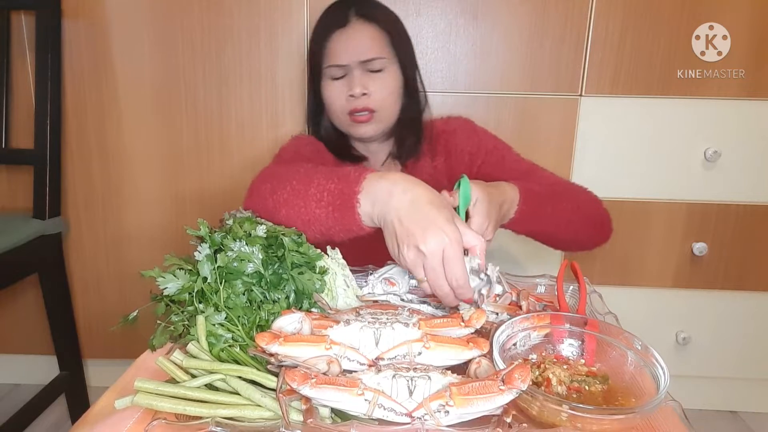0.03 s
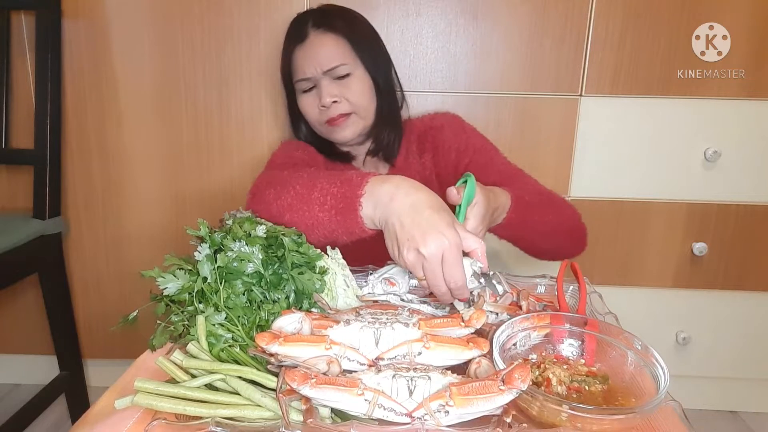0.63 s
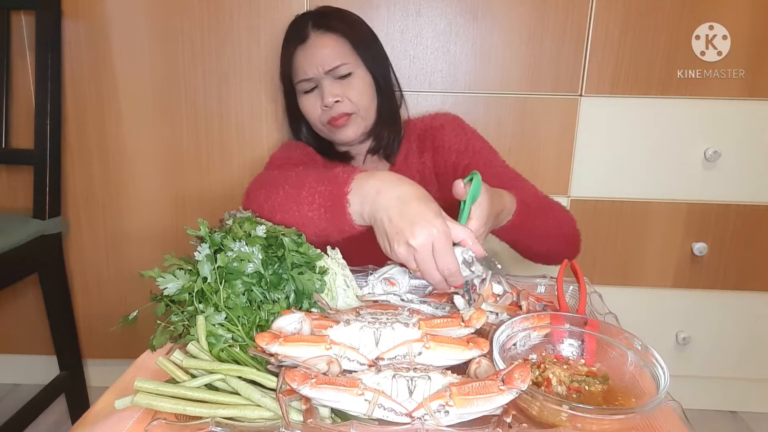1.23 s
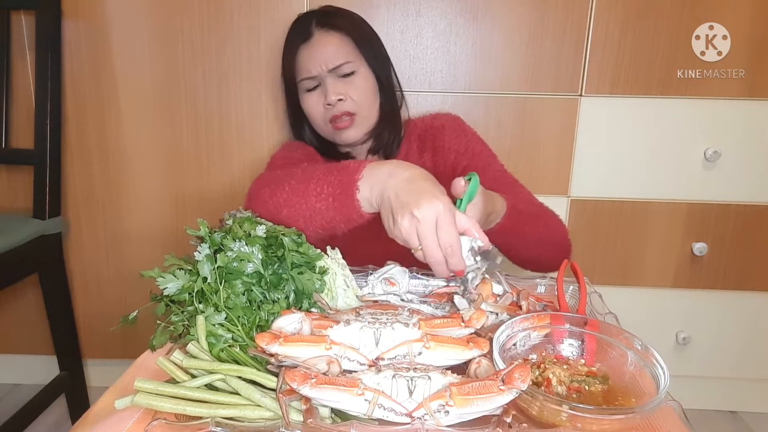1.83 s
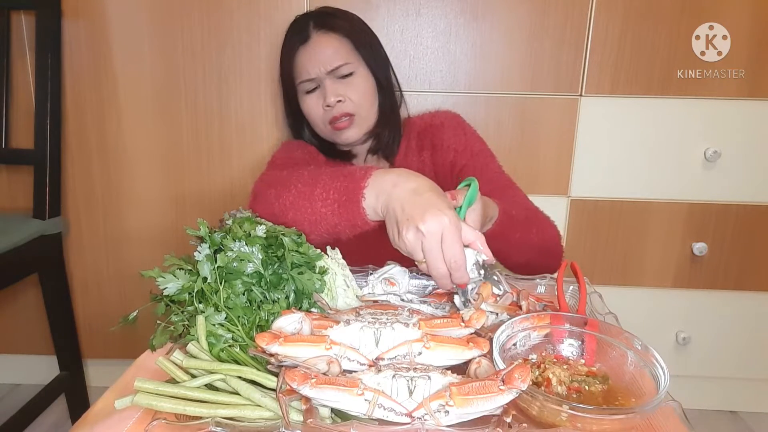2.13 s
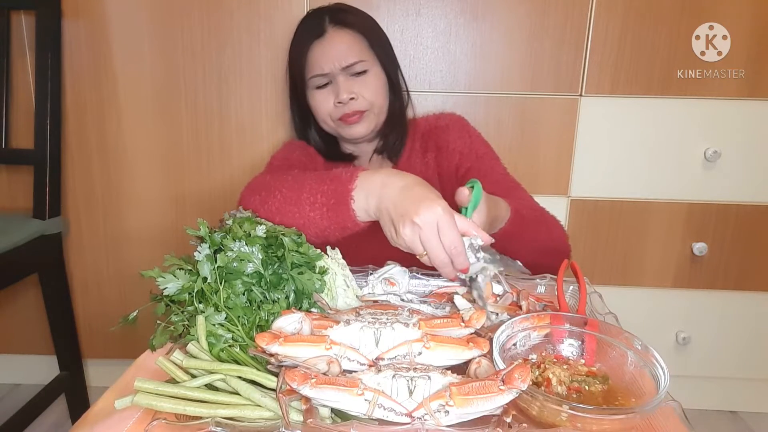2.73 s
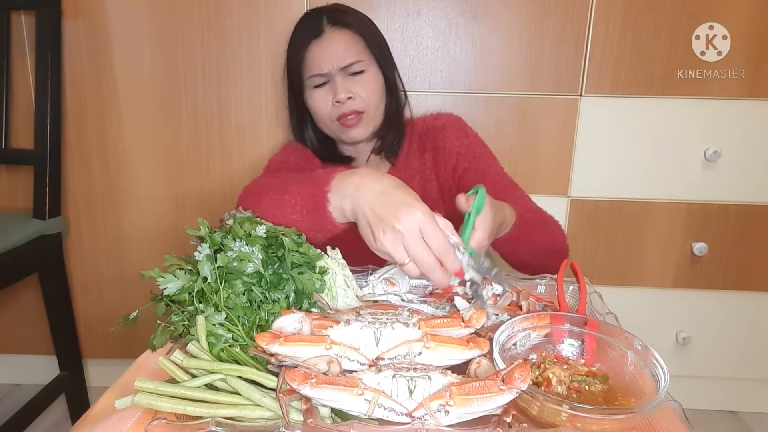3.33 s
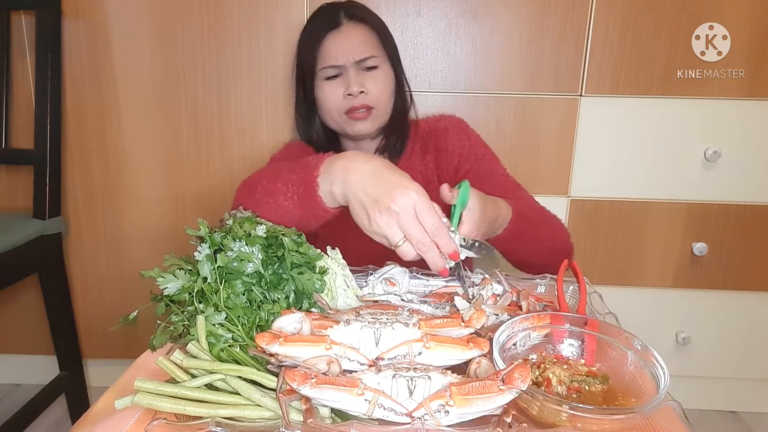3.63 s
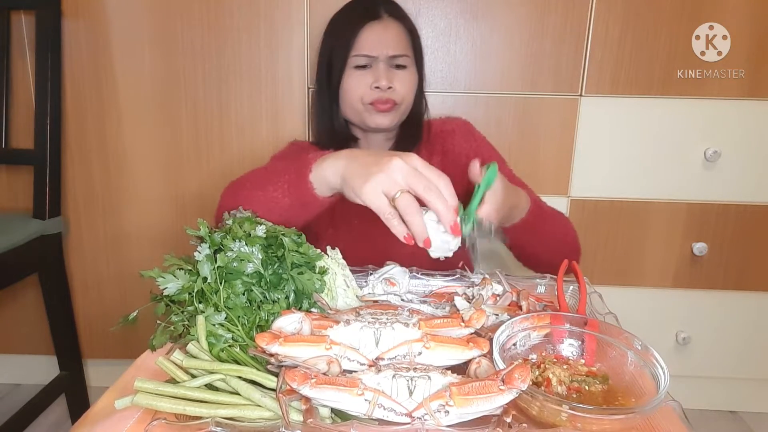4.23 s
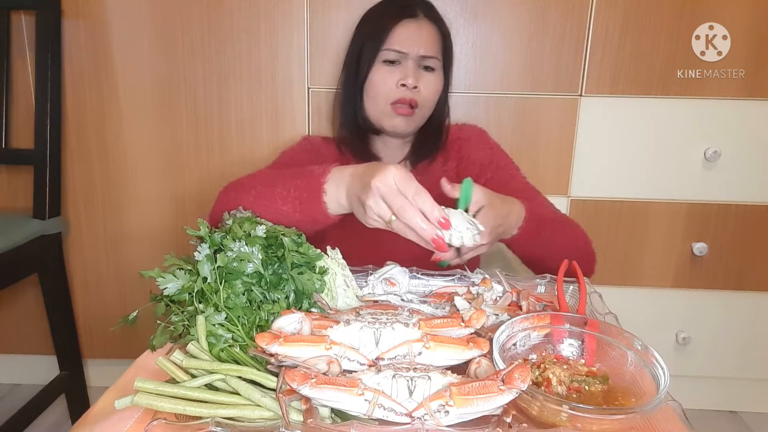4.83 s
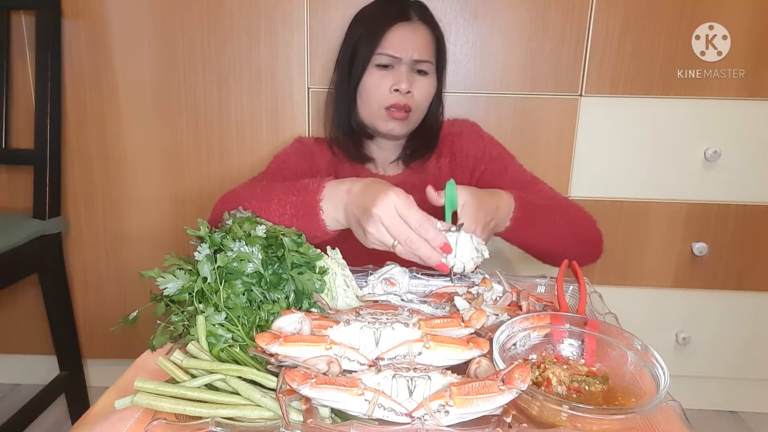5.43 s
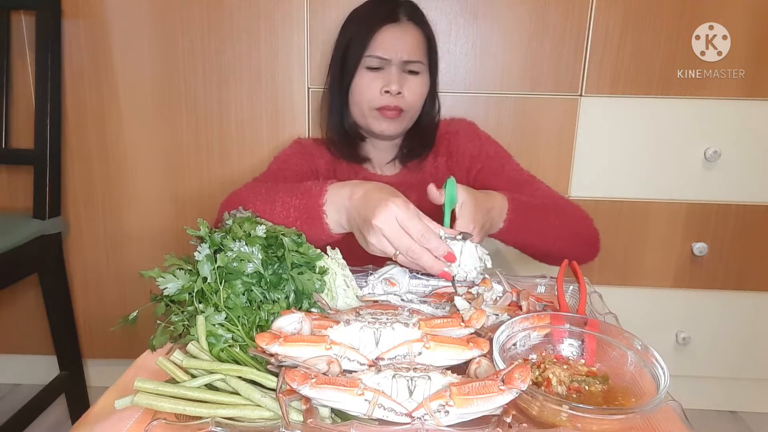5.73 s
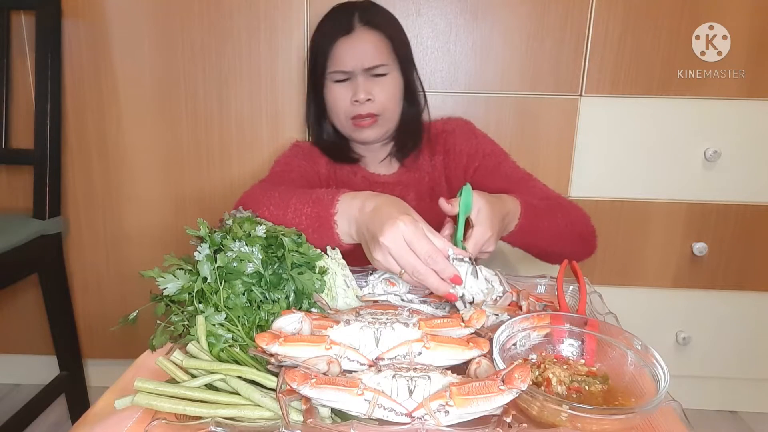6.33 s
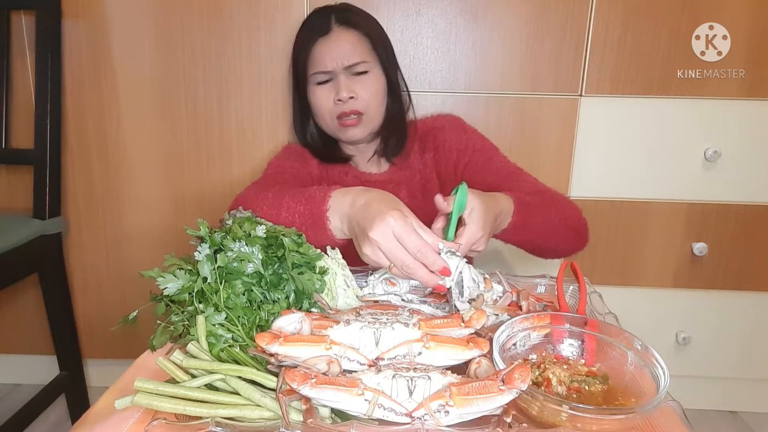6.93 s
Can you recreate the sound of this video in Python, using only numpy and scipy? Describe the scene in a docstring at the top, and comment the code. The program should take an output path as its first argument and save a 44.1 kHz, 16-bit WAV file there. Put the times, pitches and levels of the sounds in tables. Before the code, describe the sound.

In a small, hard-walled room, crab shell breaks close to the microphone as scissors work through it. Crisp snaps at the start give way to light ticks, soft scraping and faint finger rubbing. A strong double crunch comes with a knock on the tray, then things go nearly quiet before a dense series of sharp cracks and splintering. An appliance hums very faintly underneath.

```python
"""A small hard-walled dining room, where kitchen scissors cut through a cooked crab over a serving tray.
The shell fails by brittle fracture, in clusters of millisecond cracks that excite its cavities. Friction
sets the steel blades ringing; fingers crumble and rub the shell; the crab knocks and squeaks on the tray,
and the table thuds under the hands. The room reverberates after every crack, over a faint appliance hum."""
import sys
import numpy as np
from scipy import signal
from scipy.fft import rfft, irfft
from scipy.io import wavfile
from scipy.ndimage import uniform_filter1d

SR = 44100
rng = np.random.default_rng(int(sys.argv[2]) if len(sys.argv) > 2 else 0)


def inscribe(sig):
    """Save sig as 16-bit PCM at rate SR to the path in sys.argv[1].

    A 1-D sig is mono; a 2-D sig holds one channel per row.
    Samples are clipped to [-1, 1] before scaling.
    """
    pcm = np.round(np.clip(np.atleast_2d(sig).T, -1, 1) * 32767)
    wavfile.write(sys.argv[1], SR, pcm.astype(np.int16))


N = 317079
T = np.arange(N) / SR
LEAD = SR // 10  # samples before time zero


def undb(db):
    """Amplitude ratio of a level in decibels."""
    return 10 ** (np.asarray(db) / 20)


def unit(x):
    """Normalisation to rms 1."""
    return x / np.sqrt(np.mean(x ** 2))


def with_energy(x, seconds):
    """Normalisation to the energy of rms 1 held for the given time."""
    return x * np.sqrt(seconds * SR / np.mean(np.sum(x ** 2, axis=-1)))


def clock(seconds):
    """Time axis of a transient."""
    return np.arange(int(seconds * SR)) / SR


def add(bus, s, x):
    """Superposition of a sound on a bus at time s."""
    i = LEAD + int(s * SR)
    bus[:, i:i + x.shape[-1]] += x[..., :bus.shape[1] - i]


def on_log(hz, points):
    """Interpolation of (f/Hz, value) points in log frequency."""
    f, values = np.transpose(points)
    return np.interp(np.log(hz + 1), np.log(f), values)


def cut(x, order, hz, kind):
    """Maximally flat low-pass or high-pass filter."""
    return signal.sosfilt(signal.butter(order, hz, kind, fs=SR, output="sos"), x)


def colour(x, *spectra):
    """Minimum-phase filter of the summed (f/Hz, level/dB) spectra: attacks stay sharp."""
    hz = np.linspace(0, SR / 2, 1025)
    cepstrum = irfft(np.log(undb(sum(on_log(hz, s) for s in spectra))))
    causal_fold = np.r_[1, np.full(len(hz) - 2, 2), 1, np.zeros(len(hz) - 2)]
    response = irfft(np.exp(rfft(cepstrum * causal_fold)))
    return signal.fftconvolve(x, response[None], axes=-1)[:, :x.shape[-1]]


def stereo_noise(size, width=1., apart_hz=800):
    """Spatial coherence: noise at two nearby points is alike in the bass, less so in the treble."""
    mid, side = rng.standard_normal((2, size))
    side = width * cut(side, 1, apart_hz, "high")
    return np.array([mid + side, mid - side])


def wander(rate_hz):
    """Slow random modulation of rms 1."""
    hold = int(SR / rate_hz)
    steps = np.repeat(rng.standard_normal(N // hold + 1), hold)
    return unit(uniform_filter1d(uniform_filter1d(steps, hold), hold)[:N])


def ring(modes, t):
    """Modal superposition: damped sines, weighted at random for the point of contact."""
    hz, db, t60 = np.transpose(modes)[:, :, None]
    weight = undb(db + 2 * rng.standard_normal(hz.shape)) * rng.choice([-1, 1], hz.shape)
    return np.sum(weight * np.sin(2 * np.pi * hz * t) * np.exp(-np.log(1000) * t / t60), axis=0)


def grit(size, rate_hz, spread_db, slip_s=0.00022):
    """Friction as shot noise: brief random slips of unequal size."""
    onsets = rng.random(size) < rate_hz / SR
    slips = onsets * undb(spread_db * np.minimum(rng.exponential(size=size), 5))
    return signal.lfilter([1], [1, -np.exp(-1 / (slip_s * SR))], slips) * stereo_noise(size)


# spectrum of breaking shell: f/Hz, relative level/dB
SHELL_SPECTRUM = [(100, -29.5), (400, -22), (700, -14), (1100, -8), (1500, -12.5), (2100, -6), (2800, -6.5),
                  (4300, -2.5), (6000, -1), (6900, -2.5), (8000, 1), (9800, -3), (12800, 0.5), (15500, -4)]
def shell_tone(x, body_db, top_db):
    """Size sets the spectrum: large hollow pieces add body, thin splinters add treble."""
    emphasis = [(300, 0.006), (900, body_db), (1700, body_db), (3600, 0.0026), (7000, 0), (12000, top_db)]
    return colour(x, SHELL_SPECTRUM, emphasis)


# modes of a hollow piece of shell: frequency ratio, level/dB, T60/s
CAVITY_MODES = [(1, 0, 0.017), (1.091, -6.5, 0.014), (1.62, -0.5, 0.011), (1.88, -3, 0.015),
                (3.05, -1.5, 0.0069), (3.9, 2, 0.009)]
def fracture(body_db, top_db, piece_hz, rise_s=.00017, snap_s=0.0006, tail_s=0.0048):
    """Brittle fracture: stress is released in a millisecond, and the hollow piece resonates."""
    t = clock(.04)
    release = (1 - np.exp(-t / rise_s)) * (np.exp(-t / snap_s) + undb(-16) * np.exp(-t / tail_s))
    splinter = unit(shell_tone(release * stereo_noise(len(t), width=0.74), body_db, top_db))
    hollow = ring([(ratio * piece_hz, db, t60) for ratio, db, t60 in CAVITY_MODES], t)
    hollow = unit(cut(hollow, 4, 800, "high"))  # the hollow rings only above 800 Hz
    return with_energy(splinter + undb(body_db - 9) * hollow, 0.00078)


def split(jerks, piece_hz, body_db, top_db, gap_s=.0022, growth_db=1.5, pitch_scatter=.035):
    """Crack propagation: one jerk, or several of growing strength that share the energy."""
    steps = np.arange(jerks)
    sizes = undb(growth_db * steps)
    starts = (gap_s * SR * steps).astype(int)
    pitches = piece_hz * np.exp(pitch_scatter * rng.standard_normal(jerks))
    snaps = [size * np.pad(fracture(body_db, top_db, hz), [(0, 0), (i, starts[-1] - i)])
             for size, i, hz in zip(sizes, starts, pitches)]
    return sum(snaps) / np.sqrt(np.sum(sizes ** 2))


# piece under the blades, each until the next: t/s, f/Hz, hollow body/dB, room share/dB
SHELL_PIECES = [(-.1, 1010, -8, -2.5), (.1, 940, -4.5, 0), (.2, 1040, -2.5, -1), (.8, 2800, -10, 5),
                (1.05, 2200, -13, -2.5), (1.19, 2090, -11, 3), (1.32, 1410, -7.5, 7), (2.3, 1280, 8, 3.5),
                (2.8, 1400, -3, 2.5), (3, 1897, -6.5, 9.5), (3.085, 1960, -7.5, 1.5), (3.17, 1363, -4, 0),
                (4.6, 1703, -9.5, 4), (5, 1126, 5, 0.5), (5.62, 1084, -4.5, 0), (6, 1192, -2.5, 5.5),
                (6.15, 1130, 3.5, -0.5), (6.3, 2210, -1, -1.5), (6.46, 1120, -4, -2), (6.84, 2216, 0, 0),
                (7.01, 1035, -1.5, 1), (7.039, 2070, -2, -7), (7.1, 1850, -14, -6)]
# cracks: t/s, level/dB, top treble/dB, number of jerks
SHELL_CRACKS = [(-.004, -4, -5, 1), (0.1151, -10.7, -6, 2), (0.2377, -26.5, -3, 1), (.2465, -18.5, 10.5, 1),
                (0.9307, -22, -3.5, 1), (1.1395, -36.5, -7, 1), (1.2289, -27.5, 0.5, 1),
                (1.3808, -29.5, 3.5, 1), (1.5537, -36.5, -2, 1), (2.6852, -38.5, -10, 1),
                (2.7011, -36.5, -3, 1), (2.728, -38.5, -9, 1), (2.8431, -35, 1.5, 1),
                (3.0645, -38.5, -10, 1), (3.076, -19, 4.5, 1), (3.091, -4, -2.5, 3), (3.2155, -11, 7, 1),
                (3.2202, -9, 2, 2), (4.728, -52, 15, 1), (4.868, -49.5, 4, 1), (5.024, -55, -2.5, 1),
                (5.177, -48.5, 1, 1), (5.5539, -40, -12.5, 1), (5.6823, -41, -4, 1),
                (5.7632, -27.5, -0.5, 1), (6.0445, -20, -7.5, 1), (6.0562, -21, 12, 1),
                (6.201, -25, -10, 1), (6.2045, -8, 0, 2), (6.272, -15, -5, 1), (6.3187, -23.5, 15, 1),
                (6.333, -11, -3, 2), (6.3499, -17.5, -19, 1), (6.3803, -16, -7, 1), (6.385, -17, 1, 1),
                (6.4077, -20, 15, 1), (6.4988, -28, 0.5, 1), (6.5305, -33, -5, 1), (6.5358, -27, 4, 1),
                (6.542, -28.5, -3, 1), (6.5747, -33, 1, 1), (6.7591, -32, -2.5, 1), (6.8709, -32.5, -1, 1),
                (6.9096, -29, 4, 1), (6.9369, -15.5, 0.5, 2), (6.9821, -23, 6, 1), (6.9909, -22.5, 1, 1),
                (7.0337, -14, -3.5, 2), (7.0401, -10.5, -5.5, 2), (7.1293, -20.5, 3, 1),
                (7.1408, -21.5, 4, 1)]
def shell_cracks(direct, to_walls):
    """Radiation: the piece being cut sets each crack's resonance and the share sent to the walls."""
    for s, db, top_db, jerks in SHELL_CRACKS:
        _, piece_hz, body_db, room_db = [piece for piece in SHELL_PIECES if piece[0] <= s][-1]
        snap = undb(db) * split(jerks, piece_hz, body_db, top_db)
        add(direct, s, snap)
        add(to_walls, s, undb(room_db) * snap)


# reverberation time of the room: f/Hz, T60/s
ROOM_DECAY = [(150, 0.18), (500, .34), (1400, 0.29), (3700, 0.32), (8000, 0.28), (15000, 0.25)]
def reverberation(x, wall_s=0.0091, early_db=-7, build_s=0.0088):
    """Diffuse field: weak scatter from the table, then wall reflections that decay band by band."""
    t = clock(.6)
    spectrum = rfft(stereo_noise(len(t)))
    hz = np.linspace(0, SR / 2, spectrum.shape[1])
    centres = [f for f, _ in ROOM_DECAY]
    tail = 0
    for (_, t60), share in zip(ROOM_DECAY, np.eye(len(centres))):
        band = irfft(spectrum * on_log(hz, np.c_[centres, share]), len(t))
        tail = tail + band * np.exp(-np.log(1000) * t / t60)
    arrival = np.where(t < wall_s, undb(early_db), 1) * (1 - np.exp(-t / build_s))
    return signal.fftconvolve(x, with_energy(tail * arrival, 1 / SR), axes=-1)[:, :x.shape[1]]


def crumb_envelope(share_db=-41.5, decay_s=.06):
    """Exponential relaxation: the trickle of crumbs jumps with each crack and dies away."""
    jumps = np.zeros(N)
    for s, db, *_ in SHELL_CRACKS:
        jumps[max(int(s * SR), 0)] += undb(db + share_db)
    return signal.lfilter([1], [1, -np.exp(-1 / (decay_s * SR))], jumps)


# spectrum of dull rubbing: f/Hz, relative level/dB
RUB_SPECTRUM = [(100, -11.5), (300, -2), (650, -1), (1200, -9), (2500, -14), (6000, -33)]
# fingers on the shell, before the gain of the grip: t/s, crackle level/dB, rubbing level/dB
FINGER_LEVELS = [(0, -59, -55.5), (.42, -77, -72), (.66, -68.5, -63), (.9, -79.5, -82.5),
                 (1.35, -63.5, -59.5), (1.85, -78, -72), (2.6, -75.5, -75), (2.8, -62.5, -61),
                 (3.05, -72, -74), (3.6, -74.5, -71.5), (3.8, -68, -62.5), (3.97, -61, -68.5),
                 (4.65, -92, -86.5), (5.05, -70.5, -66.5), (5.5, -73.5, -75.5), (6.68, -68.5, -74.5),
                 (6.8, -77, -57), (7.19, -58, -60.5)]
def fingers():
    """Friction noise: fingers crumble and rub the shell with a varying grip; cracks shed more bits."""
    s, crackle_db, rub_db = np.transpose(FINGER_LEVELS)
    crackle = unit(shell_tone(grit(N, rate_hz=3000, spread_db=2.5), body_db=0, top_db=-3.5))
    crackle *= undb(np.interp(T, s, crackle_db)) + crumb_envelope()
    rub = unit(colour(grit(N, rate_hz=1500, spread_db=3.0), RUB_SPECTRUM))
    rub *= undb(np.interp(T, s, rub_db))
    grip = undb(1.5 * wander(22) - 4)
    return grip * (crackle + rub)


# spectrum of still room air: f/Hz, relative level/dB
AIR_SPECTRUM = [(15, -41.5), (25, -10.5), (81, 3), (191, -5), (237, -16), (293, 2.5), (427, -8.5),
                (501, -3), (588, -11.5), (1060, -17.5), (1180, -14), (6040, -32), (15000, -24.5)]
def room_air(air_db=-70, rumble_db=-85):
    """Ambient noise: broadband air, alike at both ears in the bass, and a faint rumble, incoherent between left
    and right."""
    air = unit(colour(stereo_noise(N, apart_hz=500), AIR_SPECTRUM))
    rumble = unit(colour(rng.standard_normal((2, N)), [(15, -26), (55, -1.5), (110, 1.5), (300, -28)]))
    return undb(air_db) * air + undb(rumble_db) * rumble


# tones of the appliance motor: f/Hz, level/dB, modulation depth
MOTOR_TONES = [(93.7, -78.5, .6), (187, -74.5, .3), (368, -84, 0.44), (498.4, -75.5, 0.18)]
def appliance_hum():
    """Line spectrum of a motor, each tone wavering in amplitude and phase."""
    hum = 0
    for hz, db, depth in MOTOR_TONES:
        modulation = 1 + depth * (wander(10) + 1j * wander(7))
        hum = hum + undb(db) * unit(np.real(modulation * np.exp(2j * np.pi * hz * T)))
    return hum


# modes of the blades, damped by the hand: f/Hz, level/dB, T60/s
BLADE_MODES = [(2160, -5, 0.03), (2267, -3, 0.084), (2354, -1, 0.044), (2460, -6.5, .03), (2570, -4, 0.053),
               (2720, -3.5, 0.037), (2859, -3.5, 0.048), (3860, 0, .015), (4160, -3.5, 0.024),
               (6020, -11.5, 0.022)]
# strokes: t/s, duration/s, level/dB, hollow body/dB, top treble/dB, steel ring/dB
BLADE_STROKES = [(0.45, 0.067, -48, 1.5, -6, -28), (1.095, 0.049, -50, 4, -5.5, -11),
                 (1.383, .069, -47.5, 14.5, -29, -9.5), (1.721, .14, -73.5, 5.5, -4, 6),
                 (2.414, 0.059, -53.5, -3, -6, -37), (2.711, 0.038, -45, 22, -12.5, -8.5),
                 (2.857, 0.053, -58.5, 16, 2, -7.5), (3.388, 0.025, -42, 0, 1.5, 0),
                 (4.003, 0.035, -42, -8.5, -2.5, -7), (4.156, 0.038, -44.5, -21, 3.5, -3),
                 (6.701, 0.069, -48, -36, -12.5, -24), (6.877, 0.087, -44.5, -13, 2, -26)]
def scissor_strokes(bus):
    """Forced vibration: the edges grind past each other and the shell; the slips ring the steel."""
    t = clock(0.32)
    for s, length, db, body_db, top_db, steel_db in BLADE_STROKES:
        pressure = (t / length) ** 2 * np.exp(-4.5 * t / length)
        slips = pressure * grit(len(t), rate_hz=2800, spread_db=-2)
        scrape = with_energy(shell_tone(slips, body_db, top_db), length / 2)
        steel = signal.fftconvolve(slips, ring(BLADE_MODES, t)[None], axes=-1)[:, :len(t)]
        steel = undb(steel_db) * with_energy(steel, length / 2)
        add(bus, s, undb(db) * (scrape + steel))


# modes of the loaded tray: f/Hz, level/dB, T60/s
TRAY_MODES = [(238, -14, 0.022), (293.5, -8, 0.046), (342, -10, 0.063), (462, 1.5, 0.069), (523, -7, 0.13),
              (638, -0.5, 0.13), (742.5, 8, 0.042), (825, -11.5, 0.088), (914, -1.5, 0.12),
              (1040, 2, 0.043), (1137, -3, 0.14), (1335, -5, 0.036), (1570, -5, 0.052), (2260, -1, 0.033),
              (2690, 9, 0.078)]
def tray_impact(corner_hz, clatter_db=1, clatter_s=0.012):
    """Impact excitation: the tray rings and its load rattles; soft contact low-passes both."""
    t = clock(0.24)
    burst = stereo_noise(len(t), width=0.62) * np.exp(-t / clatter_s)
    clatter = colour(burst, [(100, -12.5), (280, 1.5), (2500, 2), (5000, -35)])
    impact = unit(ring(TRAY_MODES, t)) + undb(clatter_db) * unit(clatter)
    return with_energy(cut(impact, 2, corner_hz, "low"), 0.0035)


# crab and scissors striking the tray: t/s, level/dB, corner f/Hz, gap to first rebound/s
TRAY_KNOCKS = [(.487, -51, 1510, .09), (.681, -51.5, 2290, 0.017), (.736, -54, 1320, 0.031),
               (1.416, -33.5, 1070, .036), (1.611, -49.5, 700, .02), (3.2043, -23, 1900, .016),
               (5.764, -44, 1500, .018), (6.759, -46.5, 1310, .06), (7.039, -34.5, 1720, .022)]
def tray_knocks(bus, contacts=3, loss_db=6, softer=0.57, sooner=.7):
    """Inelastic collision: each rebound is weaker, duller and sooner than the last."""
    for s, db, corner_hz, gap_s in TRAY_KNOCKS:
        for _ in range(contacts):
            add(bus, s, undb(db) * tray_impact(corner_hz))
            s += gap_s
            db -= loss_db
            corner_hz *= softer
            gap_s *= sooner


# squeaks: t/s, duration/s, level/dB, start f/Hz, end f/Hz
SHELL_SQUEAKS = [(1.206, .11, -59, 339, 268), (1.302, 0.078, -63.5, 891, 930)]
def shell_squeaks(bus, jitter=0.11):
    """Stick-slip oscillation: wet shell sliding on the tray gives a brief, unsteady tone."""
    for s, length, db, start_hz, end_hz in SHELL_SQUEAKS:
        t = clock(length)
        waver = unit(uniform_filter1d(rng.standard_normal(len(t)), size=60))
        hz = np.linspace(start_hz, end_hz, len(t)) * (1 + jitter * waver)
        tone = np.sin(2 * np.pi * np.cumsum(hz) / SR)
        add(bus, s, undb(db) * unit(tone * np.sin(np.pi * t / length)))


# thuds: t/s, level/dB, f/Hz
TABLE_THUDS = [(1.422, -46.5, 200), (3.096, -45, 65), (3.235, -47.5, 119)]
def table_thuds(bus, peak_s=0.007):
    """Damped oscillation: the table top swings briefly under the weight of the hands."""
    t = clock(.12)
    for s, db, hz in TABLE_THUDS:
        swing = np.sin(2 * np.pi * hz * t) * t * np.exp(-t / peak_s)
        add(bus, s, undb(db) * with_energy(swing, 0.0063))


def scene():
    """Superposition of direct sound, reverberant field and steady background."""
    direct, to_walls, both_paths = np.zeros((3, 2, LEAD + N))
    shell_cracks(direct, to_walls)
    scissor_strokes(both_paths)
    tray_knocks(both_paths)
    shell_squeaks(both_paths)
    table_thuds(direct)
    add(both_paths, 0, fingers())
    field = direct + both_paths + reverberation(to_walls + both_paths)
    return field[:, LEAD:] + room_air() + appliance_hum()


def record(dry, low_cut_hz=42, top_hz=15500):
    """Band-limited transduction by two microphones, the left slightly more sensitive."""
    channels = cut(dry * undb([[.4], [-.4]]), 3, low_cut_hz, "high")
    return signal.sosfilt(signal.ellip(8, .2, 70, top_hz, fs=SR, output="sos"), channels)


dry = scene()
out = record(dry)
inscribe(out)
```